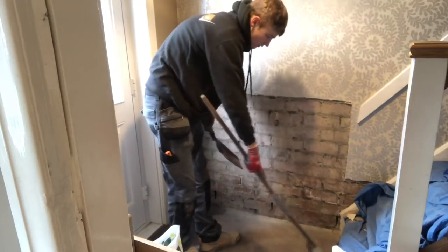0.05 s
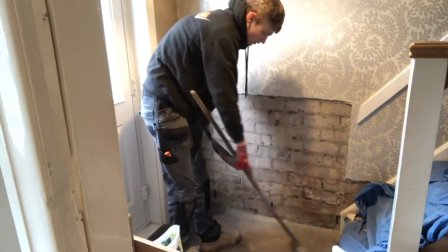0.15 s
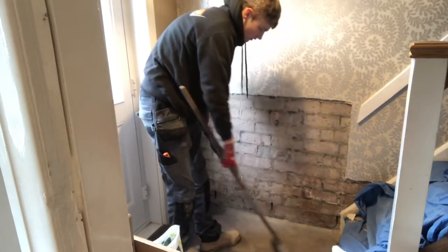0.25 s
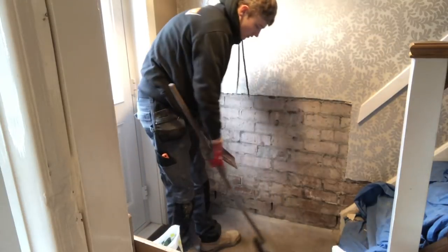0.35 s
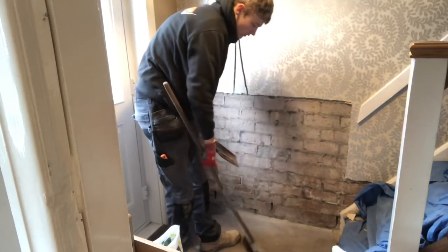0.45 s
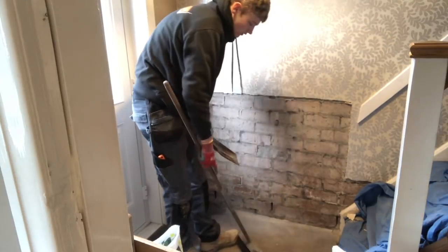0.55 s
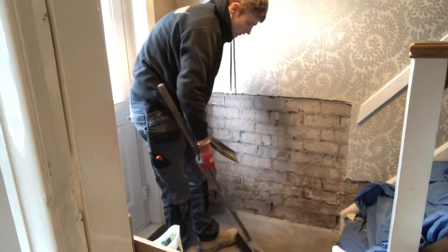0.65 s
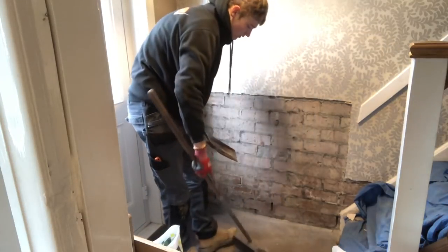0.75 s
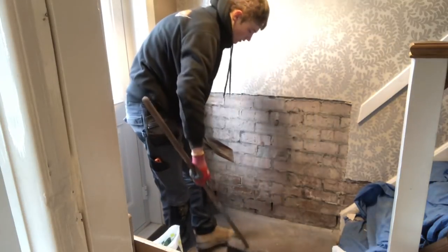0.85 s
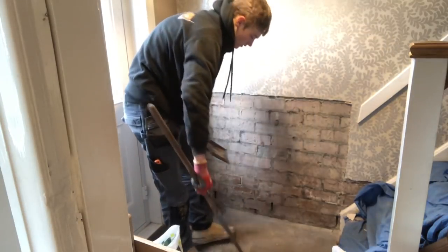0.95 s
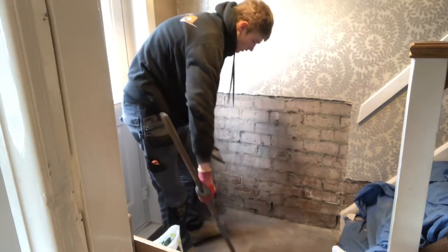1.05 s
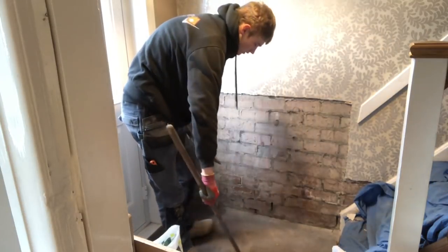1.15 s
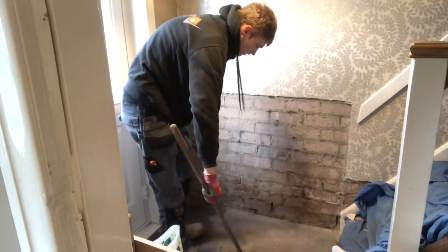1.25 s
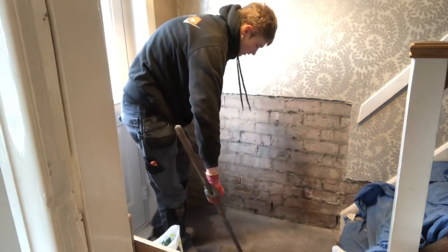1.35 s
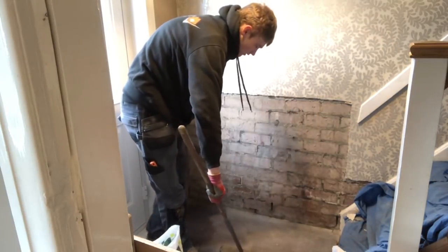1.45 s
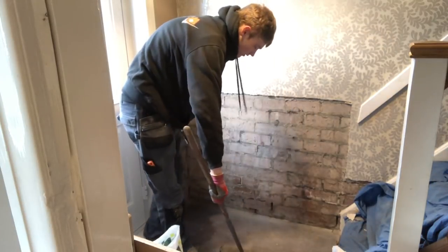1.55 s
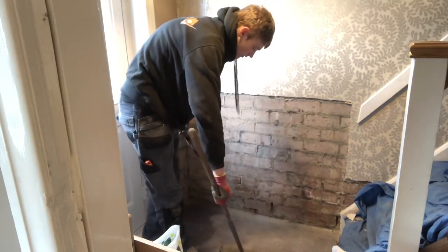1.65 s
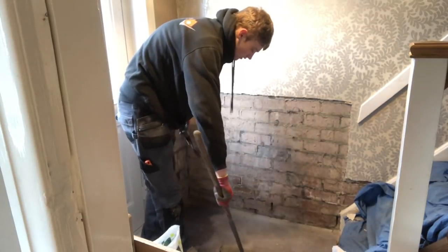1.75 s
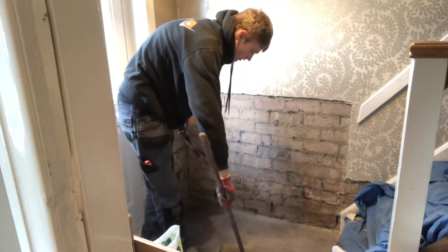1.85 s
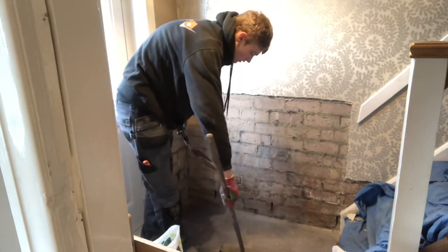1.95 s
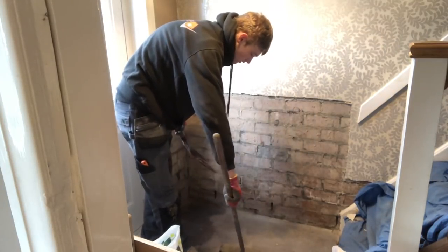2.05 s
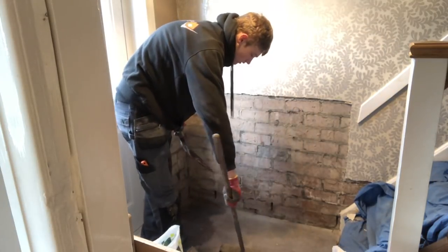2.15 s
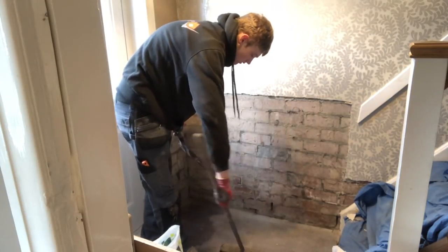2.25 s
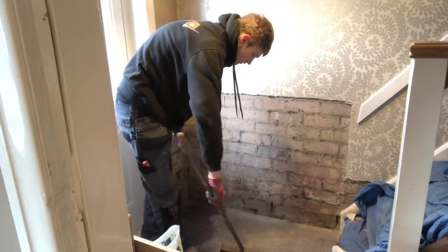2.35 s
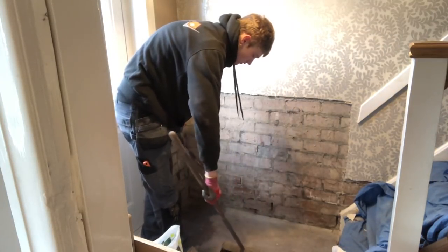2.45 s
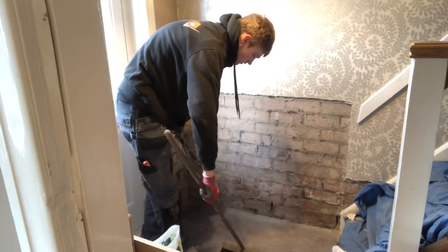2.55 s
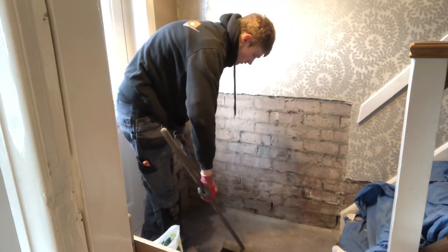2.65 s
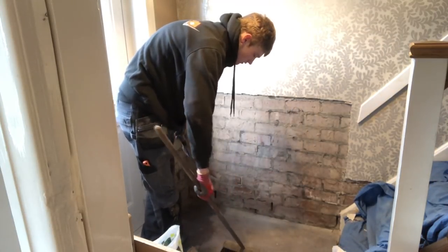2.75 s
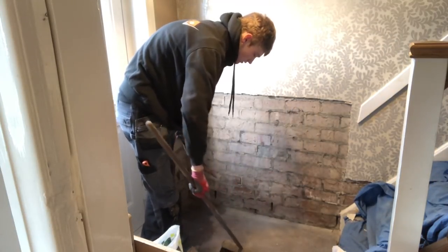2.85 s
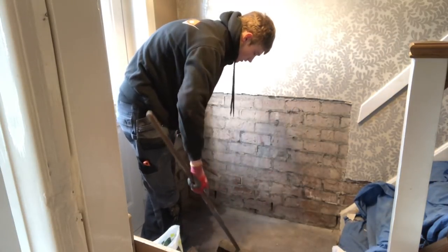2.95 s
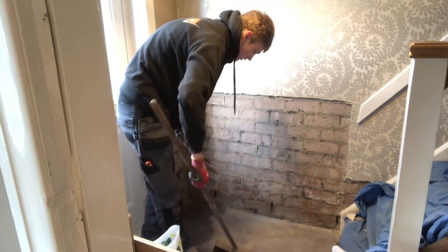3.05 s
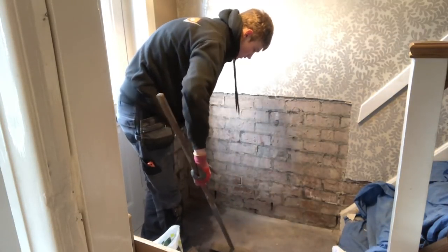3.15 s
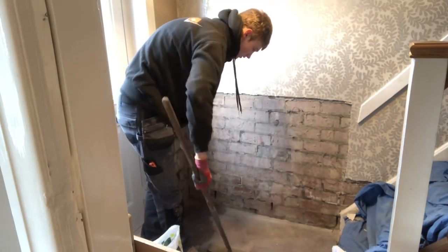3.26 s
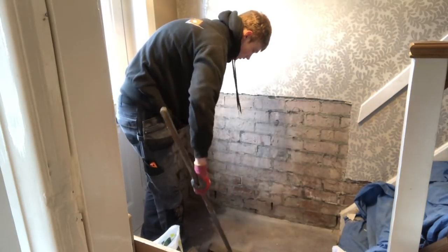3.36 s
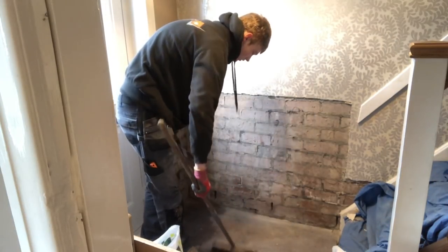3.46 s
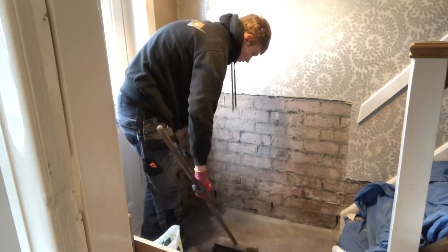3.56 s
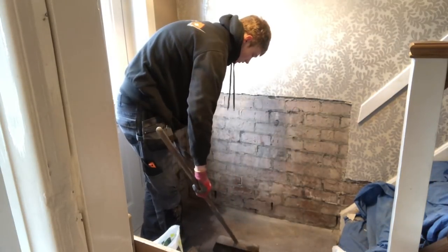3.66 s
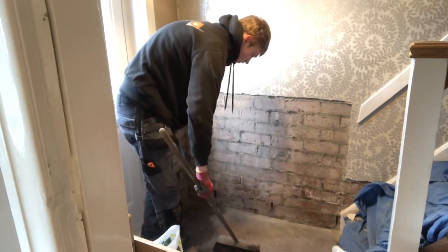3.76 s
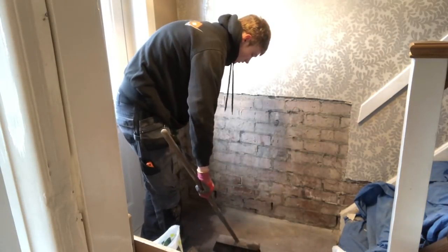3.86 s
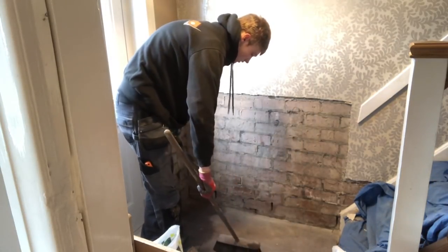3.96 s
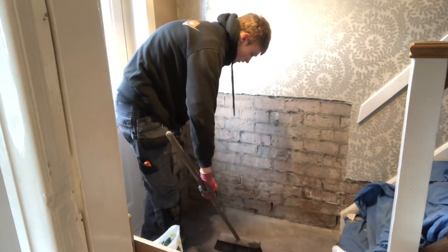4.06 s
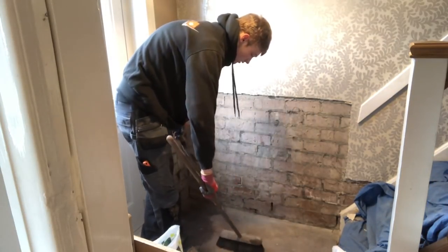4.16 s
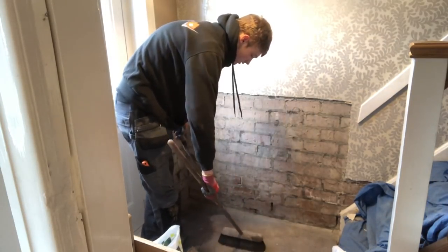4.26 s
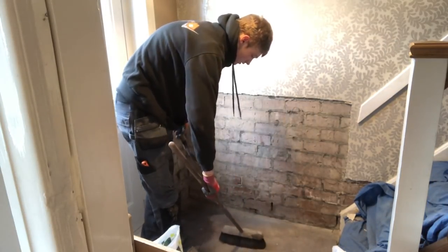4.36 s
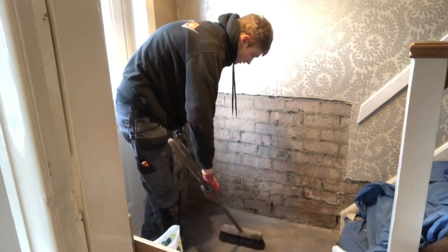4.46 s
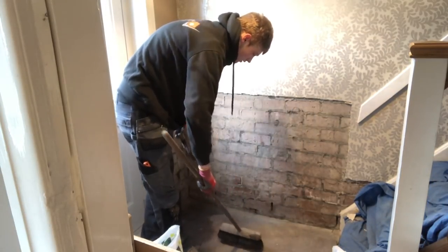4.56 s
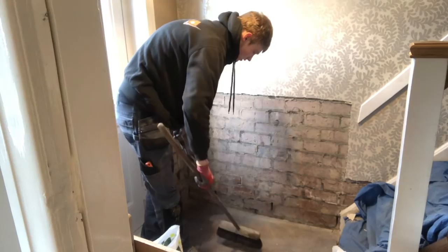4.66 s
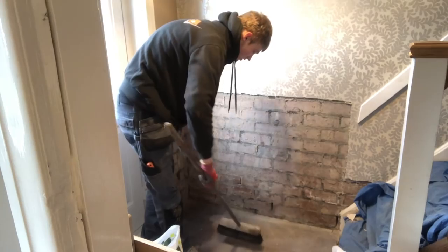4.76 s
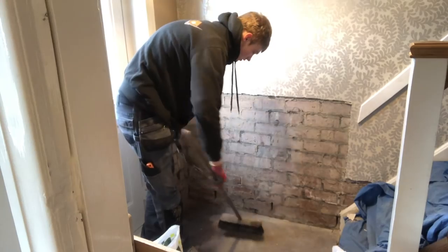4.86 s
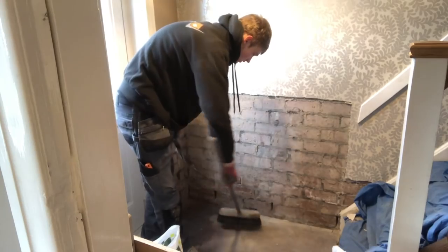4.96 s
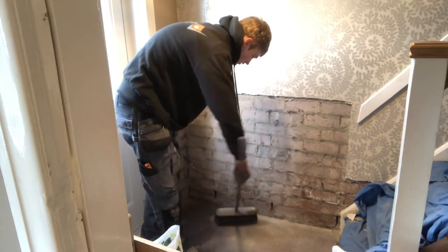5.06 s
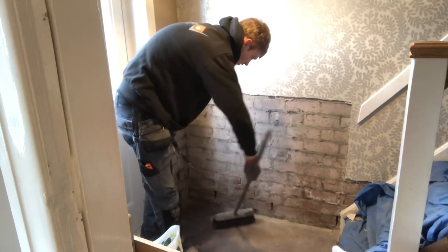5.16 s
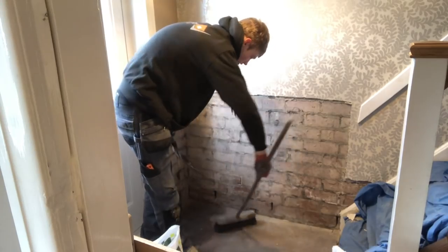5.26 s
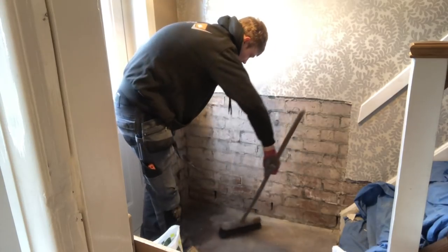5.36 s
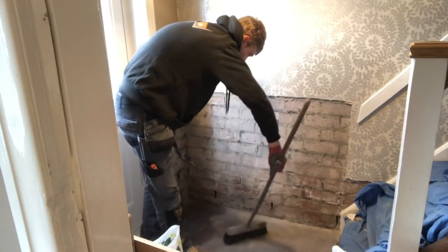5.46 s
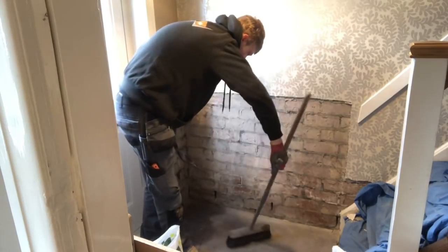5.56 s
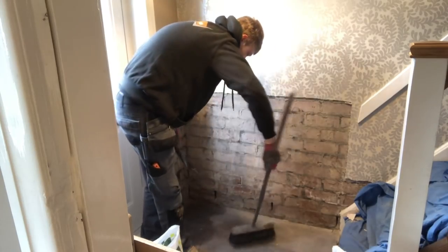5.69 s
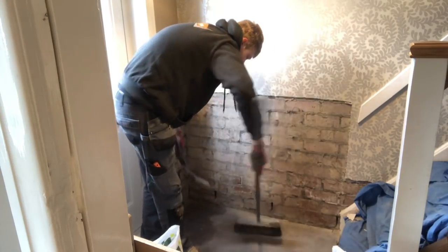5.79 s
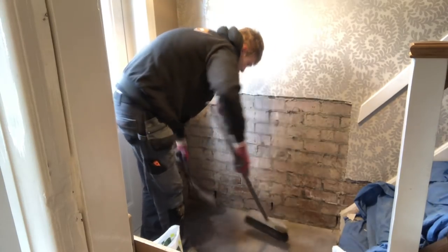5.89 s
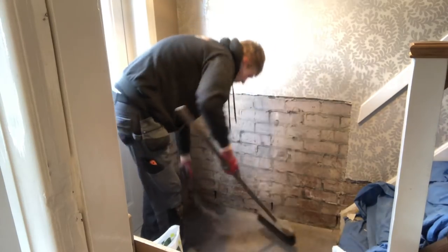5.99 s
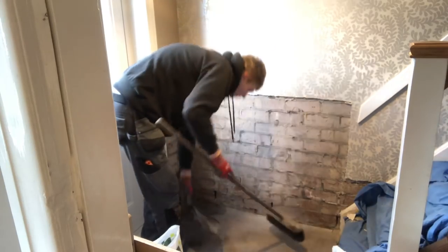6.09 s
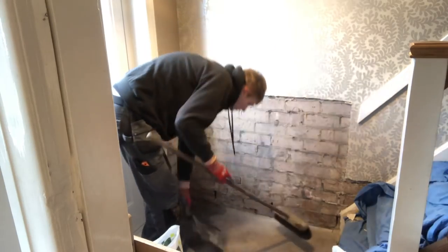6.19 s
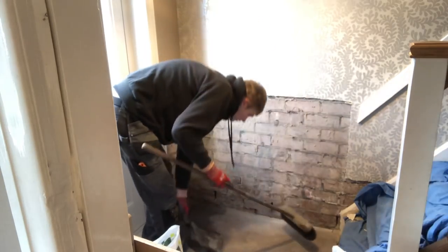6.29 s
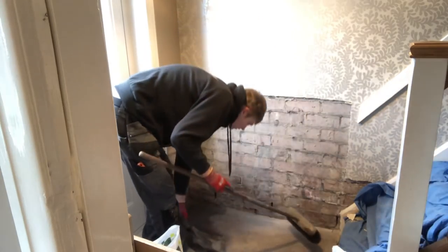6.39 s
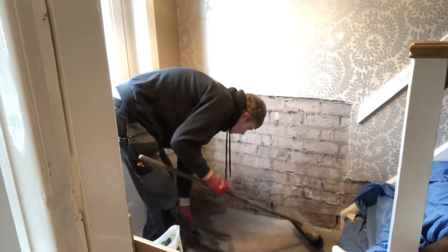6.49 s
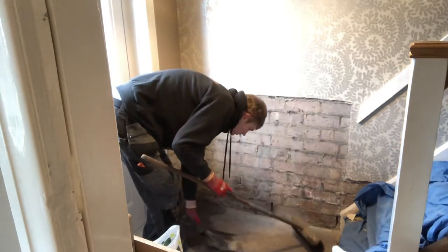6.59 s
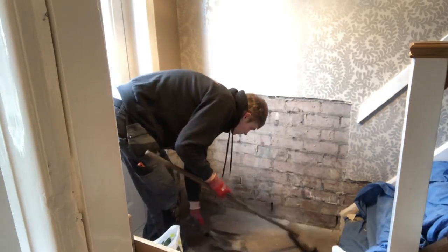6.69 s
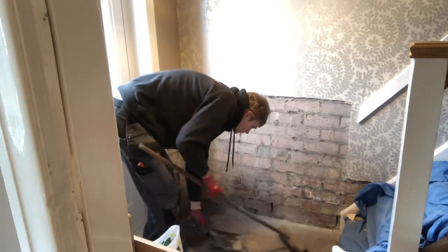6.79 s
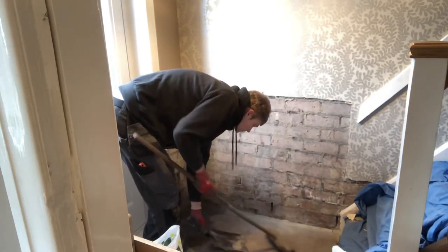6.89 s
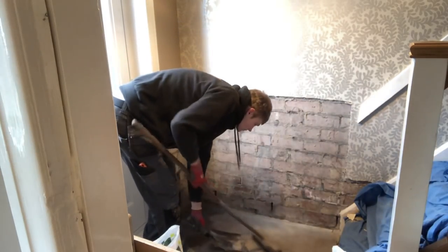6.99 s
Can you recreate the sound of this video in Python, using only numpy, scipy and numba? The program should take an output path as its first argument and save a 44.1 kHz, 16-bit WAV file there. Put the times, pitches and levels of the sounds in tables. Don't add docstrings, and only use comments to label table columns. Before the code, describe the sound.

Loose rubble tumbles and thuds, uneven broom strokes rasp across a concrete floor indoors, then a loud metal shovel slap and harsh grinding scrapes.

```python
import sys
import numpy as np
from scipy import signal
from scipy.fft import rfft, irfft
from scipy.io import wavfile
from scipy.ndimage import uniform_filter1d
from numba import njit

SR = 44100
rng = np.random.default_rng(int(sys.argv[2]) if len(sys.argv) > 2 else 0)


def wav_out(sig):
    wavfile.write(sys.argv[1], SR, np.round(np.clip(np.atleast_2d(sig).T, -1, 1) * 32767).astype(np.int16))


def nominal_scale(level):
    x = np.asarray(level, float) / 20
    return 10 ** x


N = 310023
T = np.arange(N) / SR
SLOW_T = T[::32]
SLAM_S = 6.394


def level(x, db):
    return x * nominal_scale(db) / np.sqrt(np.mean(x ** 2))


def colour(x, points):
    hz, db = np.transpose(points)
    grid_hz = np.maximum(np.fft.rfftfreq(4096, 1 / SR), 1)
    log_gain = np.interp(np.log(grid_hz), np.log(hz), db) * np.log(10) / 20
    cepstrum = irfft(log_gain)
    cepstrum[1:2048] *= 2
    cepstrum[2049:] = 0
    impulse = irfft(np.exp(rfft(cepstrum)))
    return signal.fftconvolve(x, impulse)[:len(x)]


def band(x, lo_hz, hi_hz, order=3):
    return signal.sosfilt(signal.butter(order, [lo_hz, hi_hz], "band", fs=SR, output="sos"), x)


@njit
def sliding(x, hz, sharp):
    y, b, l = np.empty(len(x)), 0., 0.
    for i in range(len(x)):
        g = np.tan(np.pi * hz[i] / SR)
        v = (b + g * (x[i] - l)) / (1 + g * (g + 1 / sharp))
        b, l, y[i] = 2 * v - b, l + 2 * g * v, v / sharp
    return y


def ring(x, hz, t60_s):
    turn = 2 * np.pi * hz / SR
    keep = np.exp(-np.log(1000) / (np.clip(t60_s, .002, .14) * SR))
    return signal.lfilter([0, keep * np.sin(turn)], [1, -2 * keep * np.cos(turn), keep ** 2], x)


def slips(rate_hz, spread_db):
    happens, size, sign = rng.random((3, N))
    clicks = (happens < rate_hz / SR) * np.sign(sign - .5)
    return level(clicks * nominal_scale(-spread_db * np.log(size + .002)), 0)


def patchy(rate_hz, depth_db):
    k = int(SR / rate_hz)
    steps = np.repeat(rng.standard_normal(N // 100), k)[:N]
    return nominal_scale(depth_db * uniform_filter1d(uniform_filter1d(steps, k), k))


def curves(rows):
    s, *columns = np.transpose(rows)
    return [np.interp(T, s, c) for c in columns]


def fine(control):
    return np.interp(T, SLOW_T, control)


def swell(s, rise_s, fall_s, full):
    rising = (SLOW_T - s) / rise_s
    falling = 1 + (SLOW_T - s - rise_s) / fall_s
    turn = np.where(SLOW_T < s + rise_s, rising, falling)
    return np.sin(np.pi / 2 * np.clip(turn, 0, 2)).clip(0) ** full


def fade(length_s, decay_s, rise_s):
    t = np.arange(int(length_s * SR)) / SR
    return (1 - np.exp(-t / rise_s)) * np.exp(-np.log(1000) * t / decay_s)


def add(out, s, x):
    i = int(s * SR)
    out[i:i + len(x)] += x[:N - i]


# start t/s, speed-up/s, slow-down/s, bristle hiss level/dB, grit re hiss/dB
STROKES = [(0.11, 0.25, 0.37, -49, -0.5), (0.4, 0.17, 0.18, -51.5, -15), (1.239, 0.063, 0.091, -51, -1.5),
           (1.45, 0.043, 0.15, -59.5, 0.5), (1.52, 0.058, 0.11, -59.5, -2), (1.68, 0.046, 0.21, -62.5, 1.5),
           (1.893, 0.019, 0.14, -54, 0.5), (1.94, 0.082, 0.11, -56.5, 1.5),
           (2.138, 0.0072, 0.061, -64, 1.5), (2.2, 0.024, 0.036, -61.5, -8), (2.27, .09, 0.19, -61, 3.5),
           (2.4, 0.21, 0.069, -58, 1.5), (2.768, 0.17, 0.12, -60, -0.5), (3.37, 0.048, 0.29, -64.5, -4.5),
           (3.54, 0.051, 0.18, -50, -1), (3.68, 0.11, 0.56, -61.5, 1), (4.04, 0.24, .2, -50.5, -2),
           (4.3, 0.16, 0.12, -56.5, -2.5), (5.3, 0.1, 0.12, -55.5, -3), (5.37, 0.19, 0.16, -52, -1.5),
           (5.88, 0.085, 0.07, -56.5, 0.7), (5.97, 0.068, 0.22, -62, -2), (6.2, .1, 0.25, -74, 0),
           (3.0, .06, 0.14, -74.5, -11)]
STROKE_ROUND = 0.9
TIPS_DB, TIPS_STEEP, FAST_DB = -5, 1.15, -50
DIG_SHARE, DRAG_DB = 0.94, -11.5


def strokes():
    power = np.zeros((4, len(SLOW_T)))
    for s, rise_s, fall_s, db, grit_db in STROKES:
        hiss = swell(s, rise_s, fall_s, STROKE_ROUND) * nominal_scale(db)
        tips = nominal_scale(TIPS_DB + FAST_DB) * (hiss / nominal_scale(FAST_DB)) ** TIPS_STEEP
        grit = hiss * nominal_scale(grit_db)
        dig = swell(s, DIG_SHARE * rise_s, DIG_SHARE * fall_s, STROKE_ROUND)
        rumble = dig * nominal_scale(db + grit_db + DRAG_DB)
        power += np.array([hiss, tips, grit, rumble]) ** 2
    return power


# peak t/s, grit level/dB, build-up/s, decay/s, rumble re grit/dB
HEAPS = [(0.0025, -58.5, 0.023, 0.17, 1), (0.073, -46, 0.21, .28, 1), (0.647, -54.5, 1, 1, -17),
         (1.069, -47.5, 0.13, 0.13, -16), (1.203, -33, 0.065, 0.15, -7), (1.0, -71.5, 0.41, .3, 4.5),
         (3.551, -41, 0.074, 0.22, -8), (4.63, -68, 0.18, 0.33, -18), (5.138, -66.5, 0.12, 0.23, 1.5),
         (5.217, -42, 0.04, 0.23, -5.5), (5.961, -52, .1, 0.29, 2.5), (5.77, -59.5, 1, 1, -6),
         (2.1, -62, 0.17, .3, -1), (4.1, -54.5, 0.25, 0.24, -11), (2.75, -80, 0.55, 0.65, -6)]
HEAP_HISS_DB, HEAP_TIPS_DB = -8, -17
HEAP_STEEP = 0.07


def heaps():
    power = np.zeros((4, len(SLOW_T)))
    for s, db, rise_s, decay_s, rumble_db in HEAPS:
        bright_db = HEAP_STEEP * (db + 42.5)
        spans = np.where(SLOW_T < s, (s - SLOW_T) / rise_s, (SLOW_T - s) / decay_s)
        shove = nominal_scale(db - 60 * spans)
        parts_db = [HEAP_HISS_DB + bright_db, HEAP_TIPS_DB + 2 * bright_db, 0, rumble_db]
        power += np.outer(nominal_scale(parts_db), shove) ** 2
    return power


# f/Hz, level/dB per Hz
BRISTLE = [(88, -58), (150, 7.5), (340, -13), (455, -12), (741, -1), (850, -2.5), (937, -3.5), (1780, -4.5),
           (2430, -3.5), (4720, -8), (8470, -17.5), (14900, -15.5), (15800, -17)]
# t/s, f/Hz
GRIT = [(0.08, 1110), (0.25, 1320), (0.6, 1720), (1.07, 1310), (1.2, 980), (1.45, 1250), (2.05, 1100),
        (2.6, 1120), (2.96, 1440), (3.47, 960), (3.56, 1030), (3.75, 1610), (4.63, 1510), (5.1, 1050),
        (5.57, 1450), (5.97, 1250)]
# level/dB of hiss, tips, grit, rumble
REST_DB = [-79.5, -82, -82, -90]
# level/dB of hiss, tips, grit, rumble
LINGER_DB = [-12.5, -23, -11, -17]
LINGER_S = 0.062


def broom():
    power = strokes() + nominal_scale(REST_DB)[:, None] ** 2
    keep = np.exp(-SLOW_T[1] / LINGER_S)
    power += nominal_scale(LINGER_DB)[:, None] ** 2 * signal.lfilter([1 - keep], [1, -keep], power)
    hiss, tips, tumble, drag = map(fine, np.sqrt(power + heaps()))

    bristles = colour(slips(12000, 1.8), BRISTLE) * patchy(30, .6)
    stones = colour(slips(5000, 2.3), BRISTLE) * patchy(24.98, 1.0)
    grit_hz, = curves(GRIT)
    chatter = sliding(sliding(stones, grit_hz, 1.02), grit_hz, 1.02)
    grit = level(band(stones, 700, 2500), -6.5) + level(chatter, -2.5)

    out = hiss * level(band(bristles, 2630, 7780, order=5), 0)
    out += tips * level(band(bristles, 7300, 16000, order=5), 0)
    out += tumble * grit
    out += drag * level(band(stones, 312, 550, order=2), 0)
    return out * lift() * nominal_scale(-2.0) * (T < SLAM_S)


# t/s, peak level/dB, f/Hz, crack re peak/dB
KNOCKS = [(0.039, -42, 950, -33), (0.07, -33.5, 1080, -23), (0.705, -36, 2340, -13.5),
          (0.777, -43, 1710, -25), (0.805, -45.5, 1660, -24), (0.889, -46.5, 1540, -33),
          (0.906, -46, 1560, -21), (0.929, -46.5, 1640, -29), (1.054, -46, 2350, -30),
          (1.072, -37, 1310, -28), (1.181, -32.5, 1270, -34), (1.198, -23.5, 602, -27),
          (1.309, -38, 1050, -10.5), (1.46, -49, 1420, -19), (1.572, -46.5, 850, -2.5),
          (1.904, -48.5, 1410, -18), (1.93, -35.5, 2980, -21), (2.145, -49, 3900, -19),
          (2.225, -54.5, 1060, -2), (2.312, -57, 1350, -5), (2.932, -42, 1710, -23), (3.13, -55, 1140, -27),
          (3.466, -49.5, 900, -5), (3.552, -33.5, 1020, -35), (4.544, -44, 1490, -16),
          (4.629, -50, 1580, -19), (5.213, -40, 1140, -38), (5.809, -53, 3000, -15),
          (5.961, -33.5, 1320, -19)]
# t/s, peak level/dB, f/Hz, crack re peak/dB
SNAGS = [
    (6.559, -22.5, 1450, -5.5),
    (6.619, -21, 1830, -14),
    (6.692, -28, 2780, 7),
    (6.8, -30, 2540, -0.5),
    (6.398, -40, 257, -40),
    (6.412, -26, 1500, -12),
]
KNOCK_DECAY_S, SMALLER_DIES_SOONER = 0.052, 0.1
KNOCK_SPREAD = 1.96


def knocks():
    out = np.zeros(N)
    tick = np.eye(1, SR // 5, 40)[0]
    events = KNOCKS + SNAGS
    for (s, db, hz, crack_db), noise in zip(events, rng.standard_normal((len(events), SR // 5))):
        decay_s = KNOCK_DECAY_S * (1000 / hz) ** SMALLER_DIES_SOONER
        rattle = band(noise * fade(.2, decay_s, 0.0015), hz / KNOCK_SPREAD, hz * KNOCK_SPREAD, order=2)
        body = rattle / np.abs(rattle).max() + 0.58 * ring(tick, hz, 0.62 * decay_s)
        crack = band(noise * fade(.2, .5 * decay_s, 0.00023), 1100, 13600, order=1)
        crack *= nominal_scale(crack_db + 9.0) / np.abs(crack).max()
        add(out, s - .002, nominal_scale(db - 4.0) * (body + crack))
    return out


def lift():
    nearness = np.zeros(len(SLOW_T))
    for s, *_ in KNOCKS:
        width_s = np.where(SLOW_T < s, .012, .025)
        nearness += np.exp(-((SLOW_T - s) / width_s) ** 2)
    return fine(nominal_scale(-5 * np.minimum(nearness, 1)))


# start t/s, swell/s, fade/s, level/dB
BRUSH = [
    (5.79, .11, 0.26, -56.5),
    (5.84, 0.127, 0.066, -56),
]


def brush():
    hiss, note = (fine(swell(s, rise_s, fall_s, 1.2)) * nominal_scale(db) for s, rise_s, fall_s, db in BRUSH)
    edge = slips(5000, 2.3) * patchy(25, 2.1)
    out = hiss * level(band(edge, 3500, 5900, order=2), -1.8)
    out += hiss * level(band(edge, 2200, 2800, order=2), -8)
    return out + note * level(band(edge, 360, 470, order=2), -2.5)


# f/Hz, level/dB, t60/s
BLADE = [(1017.5, -0.5, 0.14), (1050, -26, 0.19), (1440, -30, .1), (1597, 0, 0.069), (1930, -1, 0.19),
         (2320, -18, 0.12), (2940, -5.5, 0.11), (3420, -5, 0.087), (3930, -11, 0.11), (4300, -19, .08),
         (4900, -1.5, 0.092), (6120, -5, 0.044), (6855, -2.5, 0.16)]


def blade(x):
    return sum(nominal_scale(db) * ring(x, hz, t60_s) / np.sqrt(t60_s) for hz, db, t60_s in BLADE)


# f/Hz, level/dB per Hz
SLAM = [(120, -25), (200, -30), (299, -37), (408, -19), (929, 2.5), (1390, -4), (1550, 1), (1700, 1),
        (3730, -12.5), (4900, -2), (6810, -0.5), (11200, -17.5), (15800, -13)]
SLAM_DB, SLAM_DECAY_S = -15, 0.12


def slam():
    burst = rng.standard_normal(SR // 2) * fade(.5, SLAM_DECAY_S, 0.0022)
    slap = level(colour(burst, SLAM), 0)
    slap += level(blade(slap), -11.5)
    out = np.zeros(N)
    add(out, SLAM_S, slap * nominal_scale(SLAM_DB) / np.abs(slap).max())
    return out


# t/s, scrape level/dB
SCRAPE = [
    (6.43, -37),
    (6.49, -37),
    (6.566, -27),
    (6.594, -32),
    (6.618, -24),
    (6.708, -26),
    (6.828, -39.5),
    (6.904, -51.5),
    (7.03, -47),
]
# f/Hz, level/dB per Hz
STEEL = [(88, -63), (150, 5), (347, -9.5), (532, 0.5), (660, -7), (1410, -5), (1710, -4.5), (1850, -5),
         (2040, -4.5), (2840, -5.5), (6320, -12.5), (13800, -20), (15800, -19)]
SIZZLE_DB, SIZZLE_SLOPE = -4.5, 0.76
RUMBLE_DB, RUMBLE_SLOPE = -14, 0.86


def scrape():
    scrape_db, = curves(SCRAPE)
    sizzle_db = SIZZLE_DB + (SIZZLE_SLOPE - 1) * (scrape_db + 30)
    drag_db = RUMBLE_DB + (RUMBLE_SLOPE - 1) * (scrape_db + 21)
    edge = slips(6000, 2.2) * patchy(40, 1.5)
    grind = colour(edge, STEEL)
    start = int(SLAM_S * SR)
    out = level(band(grind, 680, 3600), 0)
    out += level(np.r_[np.zeros(start), blade(edge[start:])], -16.5)
    out += nominal_scale(sizzle_db) * level(band(grind, 4700, 16200), 0)
    out += nominal_scale(drag_db) * level(band(grind, 270, 677), 0)
    return out * nominal_scale(scrape_db - 4.5) * np.clip((T - SLAM_S) / 0.075, 0, 1)


# t/s, level/dB, hardness/octaves above lowest mode, narrowness/dB per octave
BUMPS = [(0.05, -38.5, 1.4, 14), (0.83, -68, 2.1, 22), (0.942, -57, 3.1, 6), (1.204, -40, 0.53, 3.5),
         (1.77, -59.5, 1.4, 2.5), (2.127, -68, 1.6, 7), (2.699, -65.5, 2.1, 19), (3.558, -48.5, .35, 10),
         (4.069, -77, 1.1, 3), (5.131, -61, 1.8, 13), (5.227, -54.5, 1.75, 10), (5.243, -46.5, 0.81, 12),
         (5.868, -59, 1.7, 24), (5.957, -61.5, 3, 3), (6.109, -62.5, 2.1, 10), (6.335, -61, 2.2, 11),
         (6.404, -37, 1.42, 17), (6.812, -51.5, 1.73, 5.5), (1.715, -67, .5, 10)]
# f/Hz, t60/s
HALL_MODES = [(54, 0.48), (70, 0.32), (146, 0.33), (230, 0.4)]
LOWS_MEET_S = 0.0257


def bumps():
    out, t = np.zeros(N), np.arange(SR // 2) / SR - LOWS_MEET_S
    shakes = rng.standard_normal((len(BUMPS), len(HALL_MODES), SR // 2))
    for (s, db, hard, narrow_db), noise in zip(BUMPS, shakes):
        for (hz, t60_s), shake in zip(HALL_MODES, noise):
            octaves = np.log2(hz / HALL_MODES[0][0])
            share_db = -narrow_db * abs(octaves - hard)
            pair = np.cos(2 * np.pi * hz * t)
            pair += .5 * np.cos(2 * np.pi * 1.05 * hz * t + .5 * shake[0])
            rough = level(band(shake, hz / 0.91, hz * 1.365, order=2), -6)
            envelope = fade(.5, t60_s, 0.019) * fade(.5, 50, 0.0039)
            add(out, s - .006, nominal_scale(db + share_db + 5.5) * (pair + rough) * envelope)
    return out


HALL_T60_S, HALL_TREBLE_T60_S = 0.35, 0.2


def hall(x, wet_db):
    t = np.arange(SR // 2) / SR
    low, high = rng.standard_normal((2, len(t))) * (1 - np.exp(-t / 0.0021))
    tail = band(low, 78, 1540, order=1) * nominal_scale(-60 * t / HALL_T60_S)
    tail += band(high, 6000, 19200, order=1) * nominal_scale(-60 * t / HALL_TREBLE_T60_S)
    tail *= nominal_scale(wet_db) / np.sqrt(np.sum(tail ** 2))
    return x + signal.fftconvolve(x, tail)[:N]


# f/Hz, level/dB per Hz
HUSH = [(15, -48), (25, -4), (70, -13.5), (102, -10), (126, -6), (144, -4.5), (299, -11.5), (361, -12.5),
        (392, -8), (587, -12.5), (812, -16.5), (1250, -27), (15800, -37)]
HUSH_DB = -70
# f/Hz, level/dB
MAINS = [(100, -78), (200, -77.5)]


def hush():
    hum = sum(nominal_scale(db + 2.5) * patchy(8.6, 0.32) * np.sin(2 * np.pi * hz * T) for hz, db in MAINS)
    noise = level(colour(rng.standard_normal(N), HUSH), HUSH_DB)
    return noise * patchy(4.54, 1.0) + hum


def scene():
    moving = hall(broom() + brush() + slam() + scrape(), wet_db=-8)
    struck = hall(knocks(), wet_db=-2)
    return (moving + struck + bumps() + hush())[None]


def band_limit(x):
    return signal.sosfilt(signal.butter(12, 16290, fs=SR, output="sos"), x)


def record(dry):
    bass_cut = signal.sosfilt(signal.butter(5, 42, "high", fs=SR, output="sos"), dry)
    mix = signal.sosfilt(signal.ellip(10, .2, 70, 15900, fs=SR, output="sos"), bass_cut)
    return band_limit(mix)


dry = scene()
out = record(dry)
wav_out(out)
```